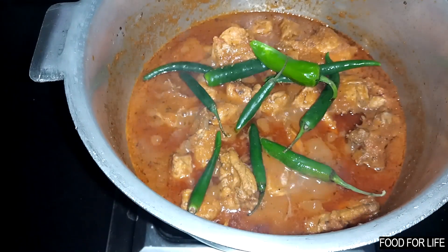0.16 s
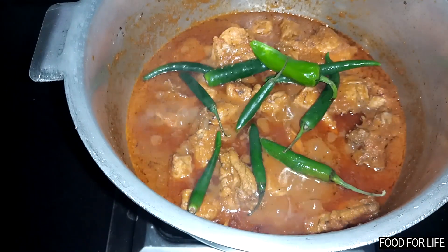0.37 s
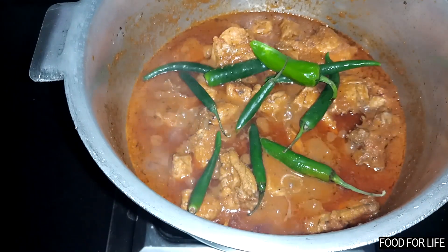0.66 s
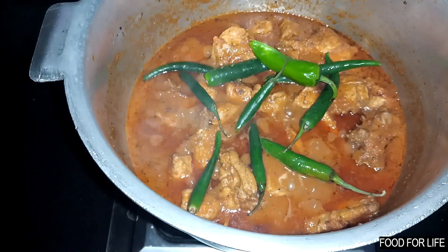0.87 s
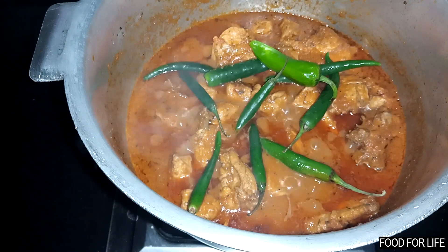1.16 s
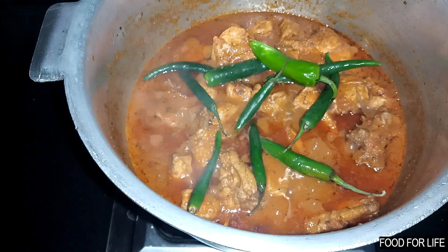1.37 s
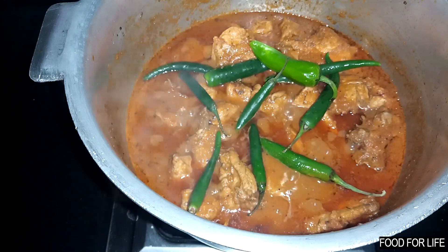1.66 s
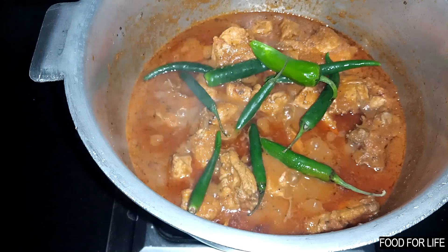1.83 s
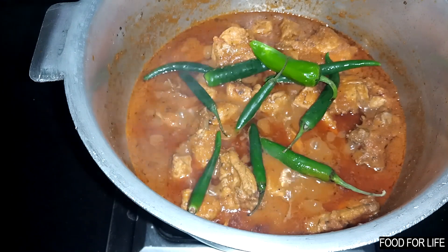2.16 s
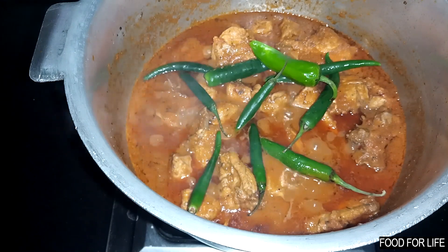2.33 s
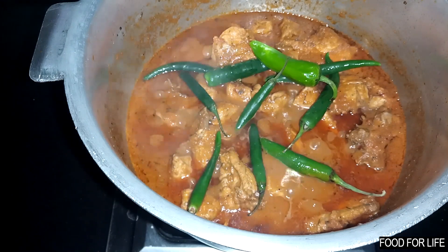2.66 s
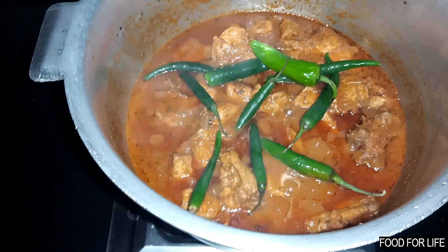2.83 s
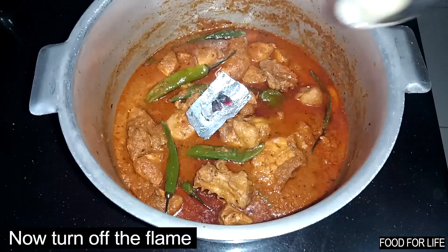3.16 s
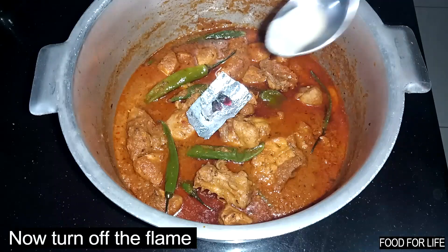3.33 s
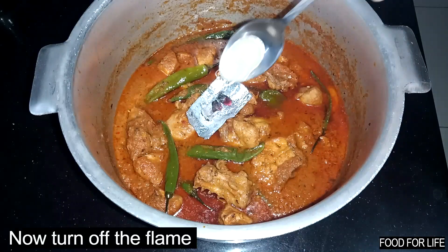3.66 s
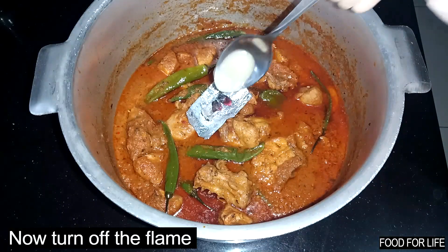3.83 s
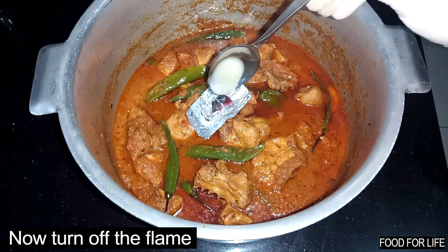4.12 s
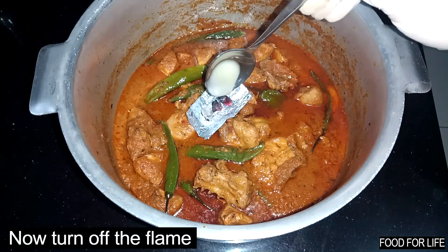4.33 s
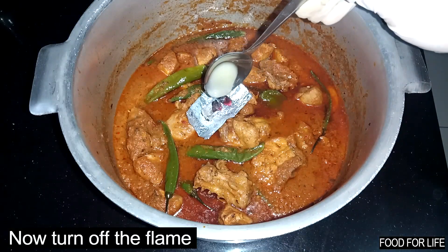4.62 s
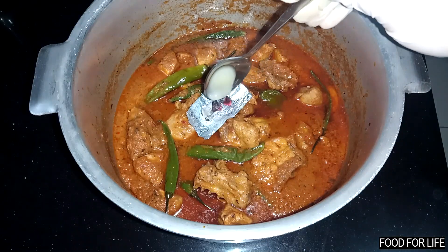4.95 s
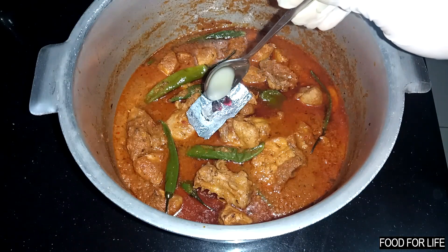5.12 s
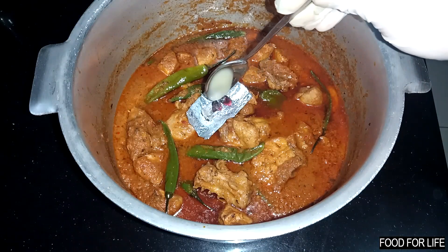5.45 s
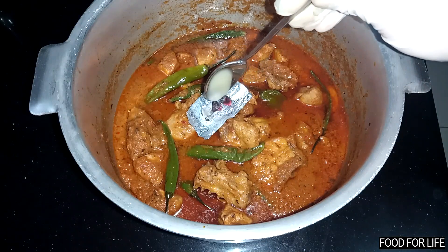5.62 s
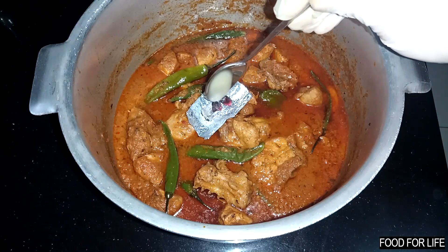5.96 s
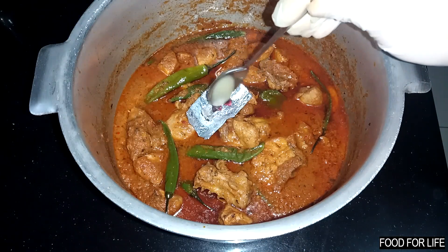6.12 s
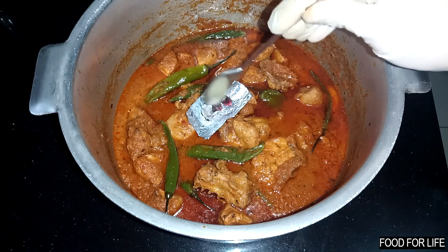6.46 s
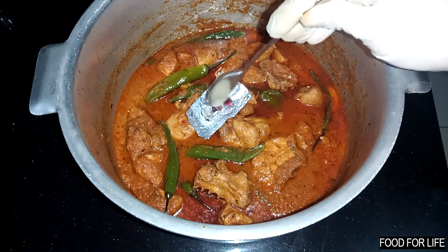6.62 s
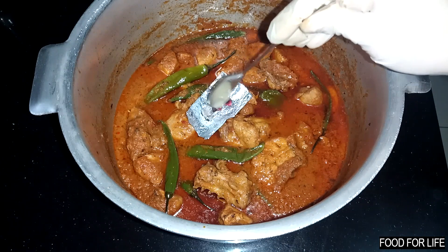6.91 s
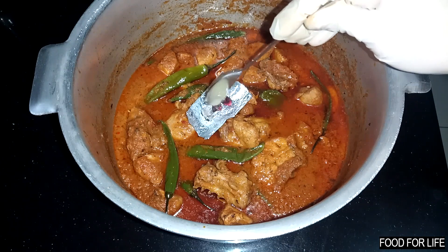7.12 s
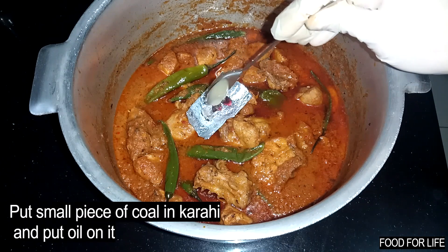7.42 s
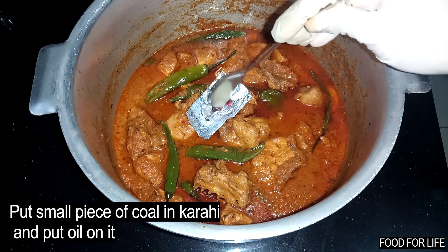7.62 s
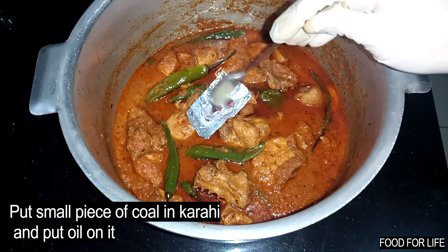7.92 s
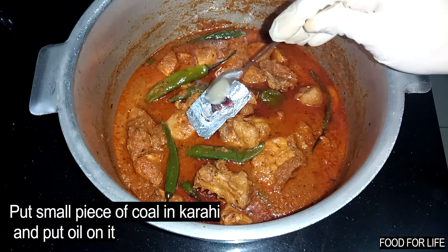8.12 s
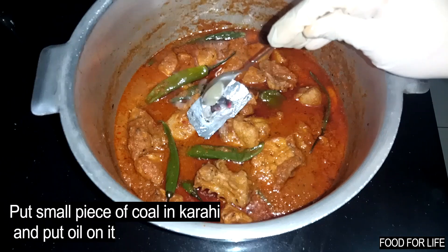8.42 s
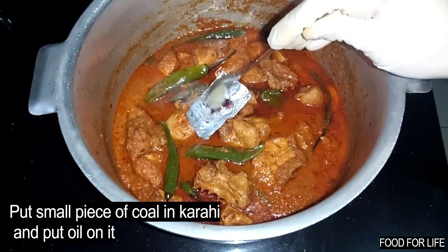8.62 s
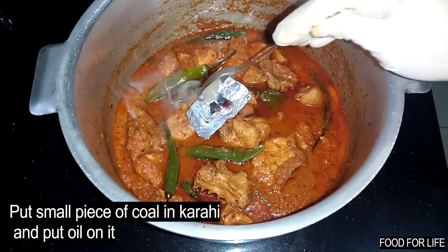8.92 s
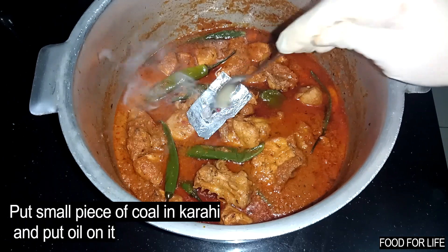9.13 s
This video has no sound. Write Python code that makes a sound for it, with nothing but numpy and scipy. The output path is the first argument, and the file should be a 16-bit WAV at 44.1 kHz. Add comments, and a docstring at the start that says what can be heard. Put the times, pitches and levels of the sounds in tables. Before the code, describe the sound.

A close microphone over a metal pot catches bubbling gravy, bright fizzing fat and low burner noise, with a single spit on hot metal early on. The simmer stops suddenly. A hushed indoor hum of far engines follows, broken by sparse sizzles and crisp clicks as oil meets hot coal inside the pot, with metallic reflections, then a delicate frying fizz and more small hisses towards the end.

```python
"""Curry simmers in a wide aluminium pot: thick bubbles plop as ringing cavities, fat crackles in tiny
bursts, the burner rumbles as low noise, and one drop spits on hot metal. In a second scene the flame is off.
Over a hum of far traffic (dull noise and gliding tones), oil is spooned onto a glowing coal in a foil cup
in the pot: it flares in short hisses, snaps in sharp clicks, fries faintly and whistles in wandering tones.
The pot's walls reflect the food, spit, flares, snaps and frying; spit and flares also set it ringing."""
import sys
import numpy as np
from scipy import signal
from scipy.fft import rfft, irfft
from scipy.io import wavfile

SR = 44100
rng = np.random.default_rng(int(sys.argv[2]) if len(sys.argv) > 2 else 0)


def waveform_to_disk(signal):
    """Save audio, clipped to [-1, 1], as 16-bit WAV at the path in sys.argv[1]."""
    frames = np.transpose(np.atleast_2d(signal))
    scaled = np.clip(frames, -1, 1) * 32767
    samples = np.round(scaled).astype(np.int16)
    wavfile.write(sys.argv[1], SR, samples)


N = 409248
TIME = np.arange(N) / SR
FLAME_OFF_S, RESUME_S = 2.815, 2.878  # end of the first scene, start of the second


def from_db(db):
    """Turn decibels into a gain."""
    return 10 ** (np.asarray(db) / 20)


def rms_one(x):
    """Scale a sound to an average strength (rms) of 1."""
    return x / np.sqrt(np.mean(x ** 2) + 1e-20)


def level(rows):
    """Gain through time from rows that start with s and end with dB; silent before the first."""
    rows = np.array(rows)
    started = TIME >= rows[0, 0]
    return from_db(np.interp(TIME, rows[:, 0], rows[:, -1])) * started


def add(out, s, sound):
    """Mix a sound in at a time."""
    at = max(round(s * SR), 0)
    out[at:at + len(sound)] += sound[:max(N - at, 0)]


def edge(x, hz, kind, order=2):
    """Butterworth low- or high-pass filter."""
    sos = signal.butter(order, np.clip(hz, 10, .45 * SR), kind, fs=SR, output="sos")
    return signal.sosfilt(sos, x)


def between(x, low_hz, top_hz):
    """A steep low edge and a gentle top edge."""
    above = edge(x, low_hz, "high", order=3)
    return edge(above, top_hz, "low", order=1)


def resonate(x, hz, q):
    """Pass the sound near one pitch; a higher q is narrower and rings longer."""
    return signal.lfilter(*signal.iirpeak(hz, q, fs=SR), x)


def coloured(x, spectrum, size=8192):
    """Causal filter shaped like the given rows of (f/Hz, level/dB); white noise keeps its power."""
    hz, db = np.transpose(spectrum)
    grid = np.log(np.fft.rfftfreq(size, 1 / SR) + 1)
    gain = from_db(np.interp(grid, np.log(hz), db))
    gain = gain * np.minimum(np.exp(grid) / hz[0], 1)  # fall away below the first row
    # fold the cepstrum so that the filter responds as early as it can
    cepstrum = irfft(np.log(gain))
    causal = (np.arange(size) < size // 2) * (np.arange(size) > 0)
    response = irfft(np.exp(rfft(2 * cepstrum * causal)))
    return signal.oaconvolve(x, response / np.linalg.norm(response))[:N]


def drift(rate):
    """Slow chance with spread 1, moving to a new value 2 * rate times a second."""
    knots = rng.standard_normal(N // 10)
    return rms_one(np.interp(TIME * 2 * rate, np.arange(len(knots)), knots))


def noise():
    """White noise."""
    return rng.standard_normal(N)


def tone(hz):
    """A sine that follows a pitch curve."""
    return np.sin(2 * np.pi * np.cumsum(hz) / SR)


def arch(start, length):
    """An envelope that swells and fades once."""
    return np.sin(np.pi * np.clip((TIME - start) / length, 0, 1))


def grains(per_s, spread_db, clump_db):
    """Tiny bursts of uneven size that come in clumps; rms 1."""
    sizes = from_db(spread_db * np.minimum(rng.exponential(1, N), 6)) * rng.choice([-1, 1], N)
    chance = per_s * from_db(clump_db * drift(25)) / SR
    return rms_one(sizes * (rng.random(N) < chance))


def wavering(x, low_hz, high_hz, depth_db):
    """Neighbouring bands swell and sink, each in its own time."""
    out, below = 0, 0
    for hz in np.geomspace(low_hz, high_hz, num=10):
        upto = signal.sosfiltfilt(signal.butter(8, hz, fs=SR, output="sos"), x)
        wobble = from_db(depth_db * drift(7) * (hz > low_hz))  # the lowest part stays steady
        out, below = out + (upto - below) * wobble, upto
    return out + x - below


def in_pot(x, wash_db):
    """The direct sound and a wash of reflections from the pot's walls that dies sooner in the treble."""
    t, white = TIME[:SR], rng.standard_normal(SR)
    long_wash = edge(white, 6500, "low", order=2) * from_db(-9.0 - 60 * t / 0.54)
    wash = long_wash + white * from_db(-60 * t / 0.039)
    return x + from_db(wash_db) * signal.oaconvolve(x, wash / np.linalg.norm(wash))[:N]


def bubble(hz, cycles, glide):
    """A cavity rings for some cycles and rises in pitch as it opens."""
    age = np.arange(0, 1, hz / (cycles * SR))
    ring = np.sin(2 * np.pi * cycles * age * (1 + glide * age))
    return ring * from_db(-60 * age) * (1 - np.exp(-2 * cycles * age))


def bubbles(rows, cycles, glide):
    """Play rows of (t/s, level/dB, f/Hz); cycles holds at 1 kHz, smaller bubbles ring for more."""
    out = np.zeros(N)
    for s, db, hz in rows:
        add(out, s, from_db(db) * bubble(hz, cycles * np.sqrt(hz / 1000), glide))
    return out


def swarm(low_hz, high_hz, least_db, range_db, count):
    """Rows of chance bubbles while the flame is on, most of them weak."""
    when, size, pitch = rng.random((count, 3)).T
    hz = low_hz * (high_hz / low_hz) ** pitch
    return np.column_stack([when * FLAME_OFF_S, least_db + range_db * size ** 3, hz])


def satellites(rows, count):
    """A collapsing bubble sheds a few weaker ones of other sizes just after it."""
    s, db, hz = np.repeat(rows, count, axis=0).T
    late, size = rng.random((len(s), 2)).T
    return np.column_stack([s + 0.03 * late, db - 3.5, hz * 2 ** (2.55 * size - 1.2)])


# colour of the crackling fat: [f/Hz, relative level/dB]
FAT_COLOUR = [(1000, -9), (1800, -13), (3500, -9.5), (5000, -8), (6300, -2.5), (7500, -4.5), (9000, -5.5),
              (11000, -12), (13500, -30.5), (16000, -25.5)]
# loudest small bubbles bursting in the fat: [t/s, level/dB before a shared gain, starting f/Hz]
FAT_POPS = [(0.173, -35.5, 5900), (0.2622, -30.5, 6200), (0.4644, -31.5, 4920), (1.607, -39, 6900),
            (1.8077, -39, 6000), (1.9644, -36, 6000), (2.0513, -38, 5730), (2.1455, -39, 4550),
            (2.5561, -37, 5610), (2.664, -39, 6460), (2.7528, -37.5, 6440)]
# distinct bubbles opening in the gravy, low plops and higher blips:
# [t/s, level/dB before a shared gain, starting f/Hz]
GRAVY_BUBBLES = [(0.077, -32.5, 393), (0.104, -34, 290), (0.147, -39.5, 1340), (0.462, -39.5, 540),
                 (1.203, -37, 690), (1.298, -34, 404), (1.317, -39.5, 720), (1.991, -37, 402),
                 (2.081, -44.5, 2470), (2.194, -38.5, 690), (2.246, -41, 2440), (2.479, -43, 2100),
                 (2.687, -33.5, 334), (2.761, -40, 2960)]
# colour of the burner's rumble: [f/Hz, relative level/dB]
BURNER_COLOUR = [(15, -55.5), (25, -19.5), (104, 2.5), (149, -3.5), (189, -2.5), (250, -13), (288, -12.5),
                 (381, -13.5), (430, -12), (494, -15), (709, -15), (1040, -23), (3000, -35), (3900, -58.5),
                 (6600, -120)]


def simmer():
    """Fat crackles and fizzes round the edge, small bubbles pop and thick ones plop, over the burner."""
    fat = coloured(grains(6500, spread_db=6.0, clump_db=2.5), FAT_COLOUR)
    fat = from_db(-59.0 + 1.5 * drift(9.6)) * fat
    froth = grains(5000, spread_db=3, clump_db=2)
    fizz = coloured(froth, [(3500, -20), (5200, -7.5), (6400, -0.5), (7800, -13.5), (11000, -22.0)])
    fizz = from_db(-63 + 4.1 * drift(22)) * fizz
    spatter = grains(60, spread_db=2.5, clump_db=2)
    ticks = from_db(-65.5) * coloured(spatter, [(4000, -23), (8500, 1.5), (13000, -13), (16000, -6.5)])

    pops = from_db(4.5) * bubbles(FAT_POPS, cycles=14, glide=.15)
    pips = bubbles(swarm(4800, 8000, least_db=-49.5, range_db=11.5, count=200), cycles=20, glide=.08)
    blips = bubbles(swarm(1300, 3500, least_db=-60.0, range_db=10, count=400), cycles=21, glide=0.21)
    plops = bubbles(GRAVY_BUBBLES, cycles=16, glide=.18)
    plops = plops + bubbles(satellites(GRAVY_BUBBLES, count=3), cycles=12, glide=.15)
    gurgle = bubbles(swarm(330, 1000, least_db=-52.5, range_db=10.5, count=150), cycles=18, glide=0.22)

    burner = from_db(-51.0) * coloured(noise(), BURNER_COLOUR)
    food = fat + fizz + ticks + pops + pips + blips + from_db(1) * plops + gurgle
    return in_pot(food, wash_db=-6.5) + burner


def burst(boiling, swell, t60):
    """One second of boiling that swells, then falls by 60 dB in each t60 seconds."""
    t = TIME[:SR]
    envelope = np.minimum(t / swell, 1) * from_db(-60 * np.maximum(t - swell, 0) / t60)
    return envelope * np.roll(boiling, rng.integers(N))[:SR]


def spit(boiling):
    """One drop of gravy boils off the hot wall: the hiss dies first, the puff and the afterboil linger."""
    out, swell_s = np.zeros(N), 0.072
    hiss = from_db(-22.5) * between(burst(boiling, swell_s, t60=0.31), low_hz=1050, top_hz=3520)
    puff = from_db(-34.5) * between(burst(boiling, swell_s, t60=0.89), low_hz=200, top_hz=443)
    afterboil = from_db(-28.5) * between(burst(boiling, swell_s, t60=0.82), low_hz=1628, top_hz=1300)
    add(out, .574, hiss + puff + afterboil)
    return out


# resonances of the pot: [f/Hz, relative level/dB]
POT_RESONANCES = [(583, 3), (1182, 5), (1461, 7), (1644, -2), (1764, -1), (2064, 7), (2224, -3), (2378, 0),
                  (2454, -1), (2482, -1), (2648, 5), (2860, 3), (3031, 2), (3313, 5), (5076, 0), (5388, 1),
                  (5993, -1), (6227, 0), (6395, 1), (6530, -1), (7200, 0), (7570, 0), (9256, 3)]
POT_T60_S = .36  # time for the ringing to fall by 60 dB


def pot_ringing(x):
    """Each resonance stores the energy that arrives near its pitch and rings down."""
    out, keep = 0, from_db(-120 / (POT_T60_S * SR))  # energy kept from one sample to the next
    for hz, db in POT_RESONANCES:
        near = resonate(x + 1e-18, hz, q=hz / 300)
        stored = signal.lfilter([1 - keep], [1, -keep], near ** 2 + 1e-24)
        out = out + from_db(db) * np.sqrt(stored) * tone(hz + 3 * drift(12))
    return out


# colour of the boiling hiss: [f/Hz, relative level/dB]
STEAM_COLOUR = [(170, 6.5), (300, 11.5), (420, -4.5), (600, 10), (1000, -8), (1500, -3), (2700, -2),
                (4100, -4.5), (5200, -1.5), (6400, 3), (8200, -5), (9500, -6), (11000, -13), (13500, -16),
                (16000, -10)]


def boil_off():
    """Drops boil off in dense bursts of tiny explosions that swell, die and leave the pot ringing."""
    boiling = grains(14000, spread_db=1.5, clump_db=2)
    hiss = from_db(2.0) * coloured(spit(boiling) + flares(boiling), STEAM_COLOUR)
    return in_pot(hiss, wash_db=-7) + from_db(-5.5) * pot_ringing(hiss)


DRONE_S, DRONE_RISE_PER_S = 1.204, 0.02407  # length of an engine tone; share by which its pitch climbs


def faint_engines(count):
    """Rows of chance engine tones, the higher the weaker."""
    low_hz, top_hz, low_end_db, loss_db_per_octave = 140.8, 480, -58, 6
    when, pitch = rng.random((count, 2)).T
    octaves = pitch * np.log2(top_hz / low_hz)
    place = (np.arange(count) + when) / count
    start = RESUME_S - DRONE_S / 2 + place * (TIME[-1] - RESUME_S)
    return np.column_stack([start, low_hz * 2 ** octaves, low_end_db - loss_db_per_octave * octaves])


def engines(rows):
    """Each engine tone swells and fades while its pitch climbs and wavers."""
    out, waver, t = np.zeros(N), drift(5), TIME[:round(DRONE_S * SR)]
    for start, hz, db in rows:
        pitch = hz * (1 + DRONE_RISE_PER_S * t) + np.roll(waver, rng.integers(N))[:len(t)]
        add(out, start, from_db(db) * np.sin(np.pi * t / DRONE_S) * tone(pitch))
    return out


# colour of the far hum heard through the walls: [f/Hz, relative level/dB]
HUM_COLOUR = [(15, -53), (25, -27.5), (54, -6.5), (112, 3.5), (158, 0.5), (193, -2), (222, 0), (271, -5.5),
              (300, -6), (389, -10.5), (447, -12), (816, -21.5), (1190, -20), (1850, -55), (3000, -103),
              (3900, -69), (6600, -120)]
# nearest of the far engines: [start t/s, starting f/Hz, level/dB before fade-in and wavering]
NEAREST_ENGINES = [(3.1, 106, -50.5), (3.1, 368, -62.5), (4.0, 242, -52), (5.35, 108, -56),
                   (5.35, 179, -58.5), (6.55, 191, -55), (6.45, 266, -55.5), (7.65, 391, -62.5),
                   (8.25, 235, -56)]
# far vehicles rushing by: [t/s when nearest, level/dB before fade-in]
VEHICLE_PASSES = [(3.55, -63), (5.0, -59.5)]
# colour of that rush: [f/Hz, relative level/dB]
RUSH_COLOUR = [(500, -3), (800, -0.5), (1150, 1.5), (1700, -2), (2400, -12.5), (3300, -26), (6000, -37.5)]


def kitchen():
    """Far traffic through the walls: a low hum, engines that glide in pitch, a passing rush; and faint hiss."""
    fade_in_s, fade_depth_db = 0.25, 14.5
    fade_in = from_db(-fade_depth_db * np.clip(1 - (TIME - RESUME_S) / fade_in_s, 0, 1))
    hum = from_db(-54.5) * coloured(noise(), HUM_COLOUR)
    hum = hum + engines(NEAREST_ENGINES) + engines(faint_engines(count=26))
    hum = wavering(hum, low_hz=464, high_hz=2620, depth_db=4.0)

    half_s, floor_db = 0.69, -72.5  # time for a pass to fall to half the pressure; the rush that stays
    passing = sum((from_db(db) / (1 + ((TIME - s) / half_s) ** 2)) ** 2 for s, db in VEHICLE_PASSES)
    rush = np.sqrt(passing + from_db(floor_db) ** 2) * coloured(noise(), RUSH_COLOUR)
    hiss_colour = [(2000, -5.0), (6300, 5), (8500, -1.5), (13000, -17), (16000, -17)]
    hiss = from_db(-86.5) * coloured(noise(), hiss_colour)
    return fade_in * (hum + rush) + hiss


# resonances of the pot's hollow: [f/Hz, width f/Hz, relative level/dB]
HOLLOW_MODES = [(1387, 280, -1), (2240, 960, -20), (2850, 205, -6.5)]


def oil_flare(boiling, db, t60, top_hz):
    """Oil flashes on the coal in a sudden hiss; the stronger it is, the more it sounds the pot's hollow."""
    swell_s, full_db, growth = 0.0048, -33.5, 0.31  # full_db sounds the hollow fully; extra dB per dB
    hiss = between(burst(boiling, swell_s, t60), low_hz=3780, top_hz=top_hz)
    push = from_db(growth * (db - full_db)) * burst(boiling, swell_s, t60=0.44)
    hollow = sum(from_db(mode_db) * resonate(push, hz, q=hz / width) for hz, width, mode_db in HOLLOW_MODES)
    return from_db(db) * (hiss + edge(hollow, 1100, "high", order=3))


# drops of oil flaring on the coal: [t/s, level/dB before shared filters, 60 dB fall t/s, top edge f/Hz]
OIL_FLARES = [(3.54, -47.5, 0.34, 2000), (4.722, -41, 0.53, 14150), (4.978, -44, 0.47, 12100),
              (5.076, -30.5, 0.32, 8000), (6.049, -65.5, .2, 14000), (6.578, -52, 0.33, 3950),
              (6.729, -63, 0.15, 10000), (7.796, -50, .1, 12070), (8.275, -58, 0.2, 13000),
              (8.509, -56, 0.36, 11900), (8.82, -64.5, 0.27, 9000), (8.945, -46.5, 0.4, 5900),
              (9.049, -48.5, 0.42, 8000)]


def flares(boiling):
    """Each drop of oil boils off the coal in its own burst."""
    out = np.zeros(N)
    for s, db, t60, top_hz in OIL_FLARES:
        add(out, s, oil_flare(boiling, db, t60, top_hz))
    return out


# snaps of the coal: [t/s, level/dB before a shared gain and filters]
COAL_SNAPS = [(4.5376, -48.5), (4.723, -40), (4.982, -33), (5.072, -22), (6.1445, -45), (6.6819, -37.5),
              (7.8036, -22.5), (7.824, -29), (8.2806, -43.5), (8.298, -42), (8.314, -41.5), (8.5108, -37),
              (8.525, -39), (8.553, -30), (8.58, -32.5), (8.6312, -38.5), (8.9464, -38.5)]
# colour of the snaps: [f/Hz, relative level/dB]
COAL_COLOUR = [(1500, 0), (2500, -11), (3300, -0.5), (5000, 9.5), (6300, 8), (8000, 4), (10000, -0.5),
               (13000, -8), (16000, -5)]


def snaps():
    """The coal cracks: a sharp click with a few milliseconds of splinters, too small to radiate lows."""
    out, t = np.zeros(N), TIME[:SR // 20]
    for s, db in COAL_SNAPS:
        splinters = 0.33 * rng.standard_normal(len(t)) * from_db(-60 * t / 0.013)
        click = t == 0
        add(out, s, from_db(db + 0.5) * (splinters + click))
    bright = edge(coloured(out, COAL_COLOUR), 2500, "high", order=6)
    return in_pot(bright, wash_db=-6.0)


# colour of the frying oil film: [f/Hz, relative level/dB]
FILM_COLOUR = [(2500, 5), (5000, 1), (6300, 11), (8000, 10), (10000, 13.5), (12000, -16), (16000, 6)]
# pores in the coal through which vapour sings: [centre f/Hz, relative level/dB]
COAL_PORES = [(6150, -12.5), (7400, -24.5), (9500, -22), (10200, -15), (13000, -20.5)]
# vapour squeezing out of a pore: [start t/s, starting f/Hz, glide in Hz per s, level/dB before reflections]
PORE_WHISTLES = [(7.88, 9700, -3300, -75), (8.37, 9900, 2297.5, -76)]
# level of the oil film frying on the coal: [t/s, level/dB before a shared gain]
FRYING_LEVEL = [(6.09, -94), (6.21, -83.5), (6.74, -82), (7.09, -90), (7.53, -81), (8.33, -89),
                (8.45, -80.5), (8.68, -83.5), (9.28, -87)]


def frying():
    """A thin oil film fizzes; vapour sings through the coal's pores in rough strands and clear whistles."""
    film = from_db(-6.5) * coloured(grains(1800, spread_db=4.5, clump_db=4.5), FILM_COLOUR)
    film = wavering(film, low_hz=4000, high_hz=14000, depth_db=3.5)
    strands = 0
    for hz, db in COAL_PORES:
        loudness = from_db(db - 2 + 6 * drift(20))
        pitch = hz * (1 + .022 * drift(9) + .032 * drift(1500))  # slow wander and fast roughness
        strands = strands + loudness * tone(pitch)
    whistle = 0
    for s, hz, glide, db in PORE_WHISTLES:
        pitch = (hz + glide * (TIME - s)) * (1 + .008 * drift(400))
        whistle = whistle + from_db(db) * arch(s, length=0.17) * tone(pitch)
    fry = from_db(10) * level(FRYING_LEVEL) * (film + from_db(2.0) * strands)
    return in_pot(fry + whistle, wash_db=-1.0)


def scene():
    """Simmering with the flame on, then the kitchen and the coal; boiling drops sound in both scenes."""
    first = np.clip((FLAME_OFF_S - TIME) / .003, 0, 1)
    second = np.clip((TIME - RESUME_S) / .02, 0, 1)
    return (first * simmer() + second * (kitchen() + snaps() + frying()) + boil_off())[None]


def record(dry):
    """The microphone port resonates near the top of the range; above it the sound is cut."""
    port = resonate(dry, 15400, q=11)
    cut = signal.ellip(10, .3, 70, 15900, fs=SR, output="sos")  # steep low-pass at 15900 Hz
    return signal.sosfilt(cut, dry + from_db(8.0) * port)


dry = scene()
out = record(dry)
waveform_to_disk(out)
```